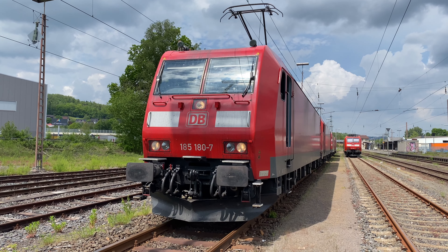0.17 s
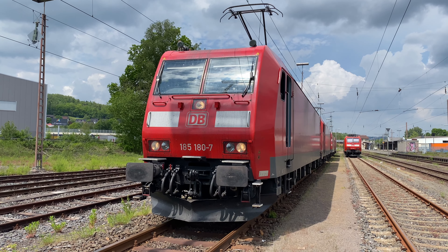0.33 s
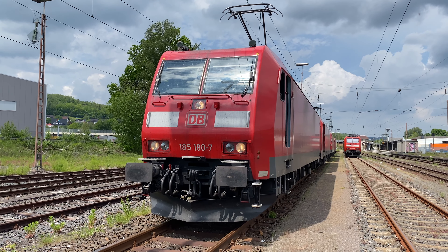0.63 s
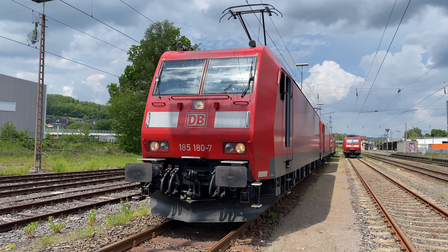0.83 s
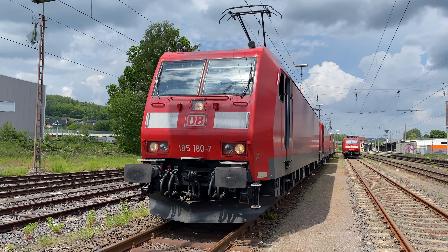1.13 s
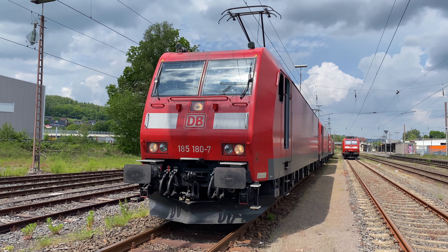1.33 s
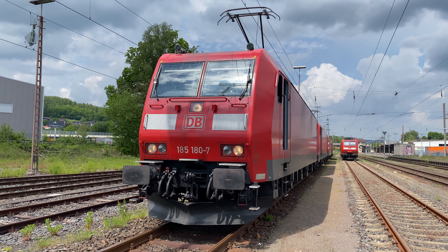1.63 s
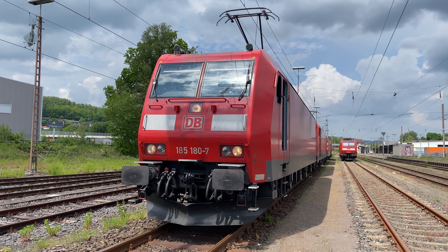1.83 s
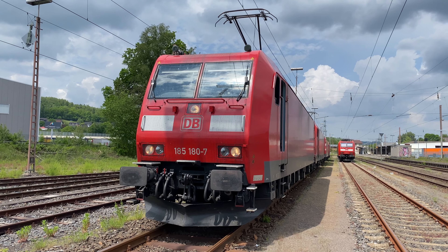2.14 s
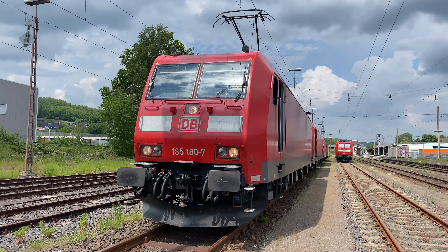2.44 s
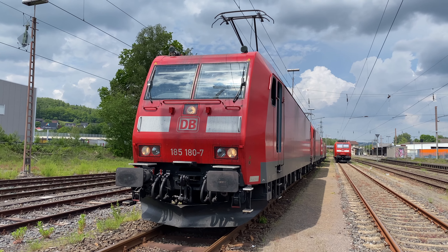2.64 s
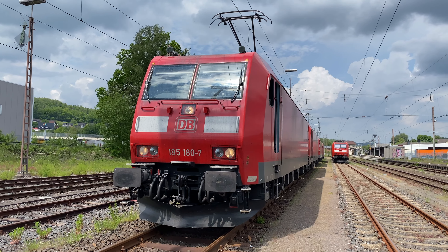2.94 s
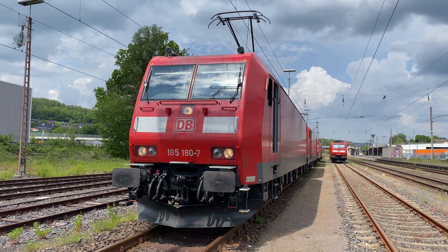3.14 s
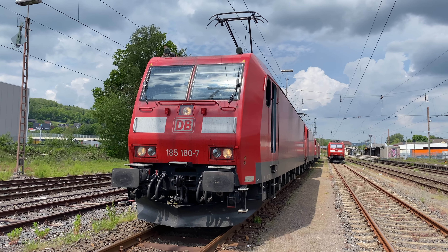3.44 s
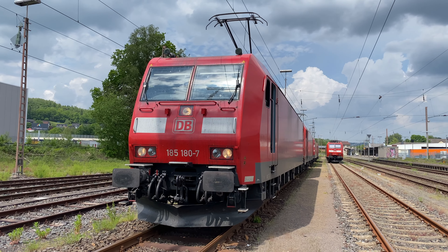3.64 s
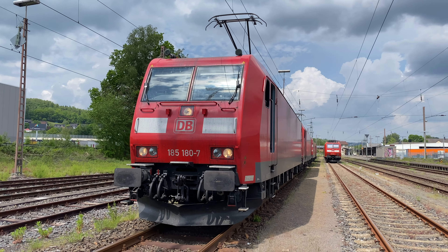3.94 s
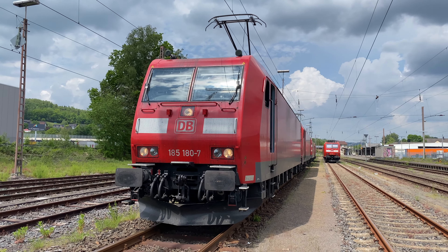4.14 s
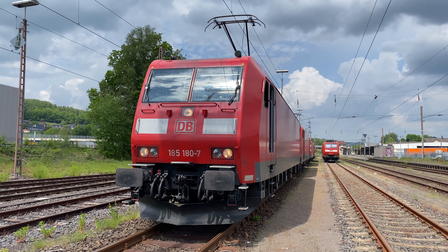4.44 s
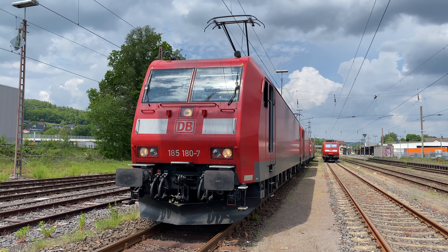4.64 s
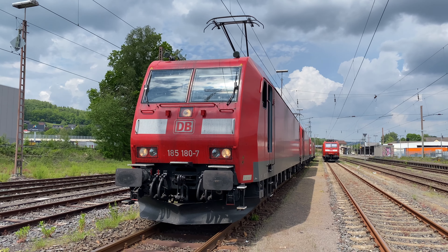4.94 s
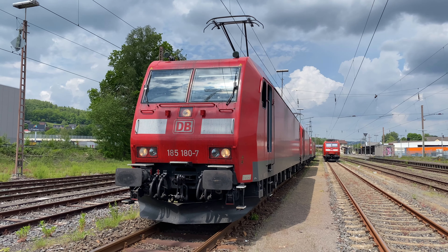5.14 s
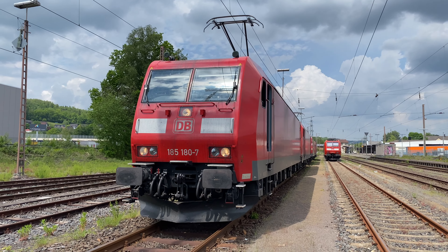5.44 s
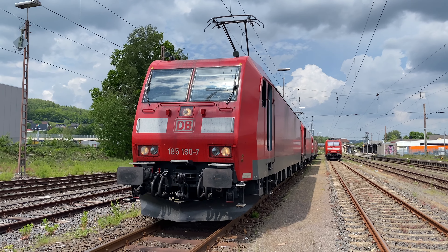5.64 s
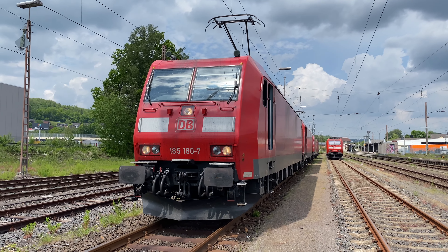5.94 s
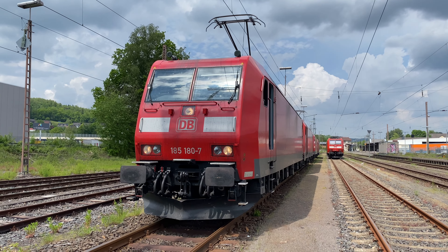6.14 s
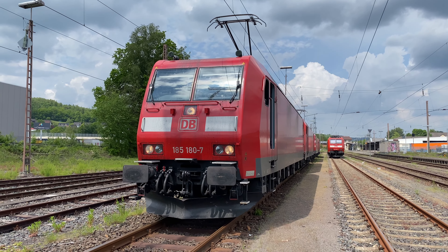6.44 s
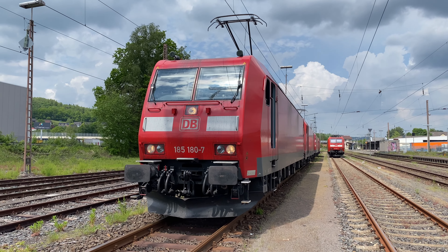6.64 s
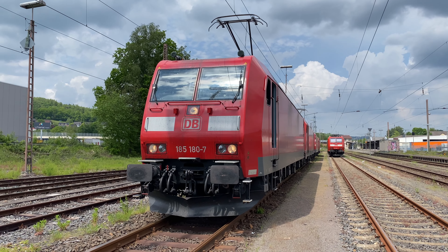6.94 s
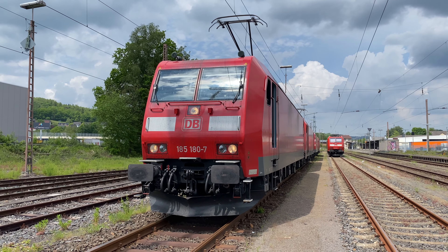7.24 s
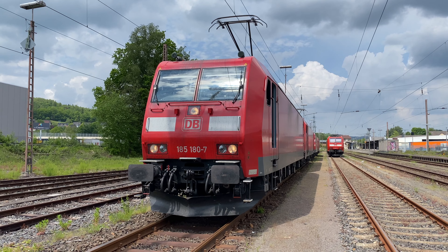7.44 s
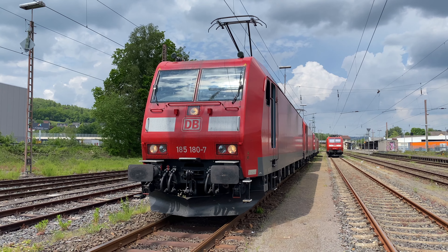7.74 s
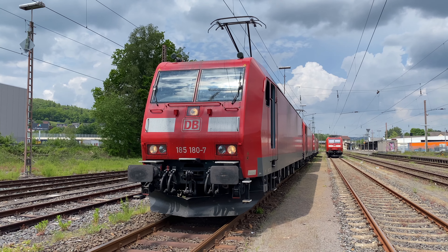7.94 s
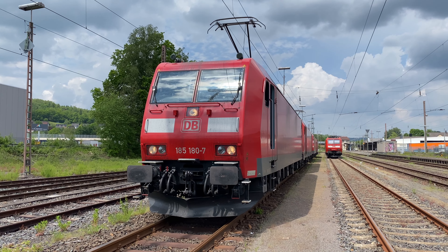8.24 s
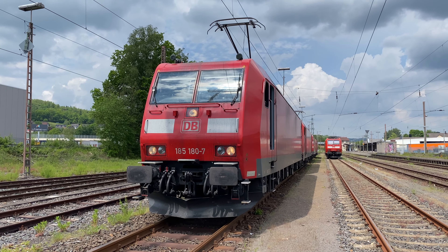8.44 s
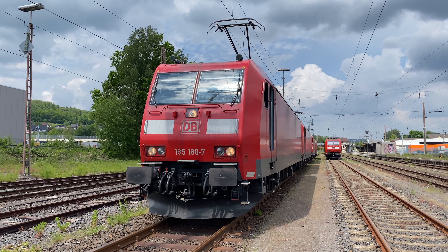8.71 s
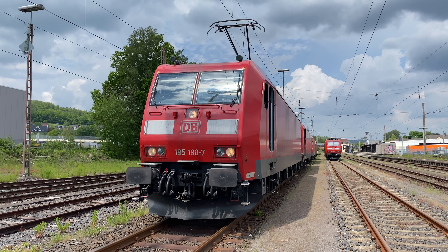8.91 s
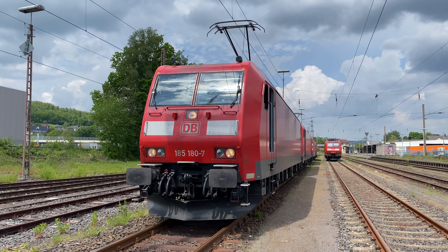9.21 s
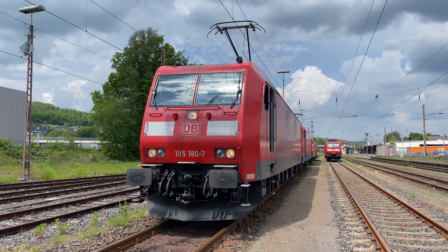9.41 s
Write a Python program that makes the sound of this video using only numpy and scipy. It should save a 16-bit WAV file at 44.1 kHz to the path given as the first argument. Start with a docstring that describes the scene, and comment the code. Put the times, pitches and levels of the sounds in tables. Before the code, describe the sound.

Constant fan roar, electrical hum and a thin throbbing whine from an idling electric locomotive, with low wind buffeting coming and going outdoors.

```python
"""Air rushes through cooling ducts, and the first gusts of wind rumble and thump on the microphone.
An electric locomotive stands switched on in a rail yard, a few metres from the hand-held microphone.
Its fans are filtered noise; motors and transformer hum as steady sines, the converter whines as throbbing
harmonics, and the motors buzz as combs of narrow-band noise. Wind is noise shaped by gusts, with single
pressure swings for the hardest eddies. There are a few small ticks, and the low sound dips briefly twice."""
import sys
import numpy as np
from scipy import signal
from scipy.fft import rfft, irfft
from scipy.io import wavfile

SR = 44100
rng = np.random.default_rng(int(sys.argv[2]) if len(sys.argv) > 2 else 0)


def int16_out(signal):
    """Quantize to a 16-bit WAV file."""
    q = np.round(np.clip(np.atleast_2d(signal).T, -1, 1) * 32767)
    wavfile.write(sys.argv[1], SR, q.astype(np.int16))


N = 422020
TIME, FREQ = np.arange(N) / SR, np.fft.rfftfreq(N, 1 / SR)  # s, Hz

SWITCH_HZ, OUTPUT_HZ = 253.52, 21.0  # converter switching and output rates
SHAFTS_HZ = (23.53, 24.5)  # rotation rates of the two fan motors
# gain course of the converter lines, shared in part by the high hum lines: (time [s], level [dB])
HIGH_LEVEL = [(0, 0), (1.2, 1.5), (2, 1), (3.2, 1.5), (3.6, -2), (4.0, 4.5), (4.4, 1.5), (5.3, 1.5),
              (5.8, 1), (6.5, 1), (7.2, 0.5), (8.4, 1), (9.5, 1.5)]


def gain_of(db):
    """Level is logarithmic: decibels to amplitude ratio."""
    return np.exp(np.asarray(db) * (np.log(10) / 20))


def read(points, hz):
    """Spectral interpolation: straight lines between table points on a log-frequency axis."""
    f, value = np.transpose(points)
    return np.interp(np.log(hz + 1), np.log(f + 1), value)


def course(points):
    """Level envelope: straight lines between table points in time."""
    return np.interp(TIME, *np.transpose(points))


def bell(x, centre, width):
    """Gaussian bump of height 1; width is the full width at 1/e."""
    return np.exp(-(2 * (x - centre) / width) ** 2)


def drift(rate_hz):
    """Low-pass random process of unit standard deviation: slow chance."""
    coarse = np.linspace(0, TIME[-1], 1024)
    hz = np.fft.rfftfreq(len(coarse), coarse[1])
    spectrum = rfft(rng.standard_normal(len(coarse))) / (1 + (hz / rate_hz) ** 2)
    wander = irfft(spectrum)
    return np.interp(TIME, coarse, wander / wander.std())


def sides(db):
    """Interchannel level difference: left and right gains of constant total power."""
    pair = gain_of(np.array([db, -db]) / 2).reshape(2, -1)
    return pair / np.sqrt(np.mean(pair ** 2, axis=0))


def noise(density):
    """Partial coherence: stereo noise of given amplitude per root Hz, partly alike at the two ports."""
    # coherence of the ports: (frequency [Hz], likeness [0-1, limited to 0.92 below])
    likeness = [(60, 0.82), (150, 0.84), (330, 0.89), (560, 0.79), (800, 0.63), (1100, 0.11), (2700, 0.18),
                (3300, 0.57), (4500, 0.8), (5300, 0.19), (7500, 1)]
    # phase between the ports: (frequency [Hz], left leads by [rad])
    left_lead = [(60, 0), (580, -0.33), (750, 0.97), (980, 1.7), (1300, 0.77), (1700, -0.94), (2000, -1),
                 (2400, 0.5), (2900, -0.5), (4000, -0.2), (4900, 0.5), (6400, 1), (7400, 0.5), (8500, -3),
                 (9600, -2.5), (10400, 0)]
    left, other = rfft(rng.standard_normal((2, N)))
    same = np.clip(read(likeness, FREQ), 0, .92)
    mixed = same * left + np.sqrt(1 - same ** 2) * other
    right = mixed * np.exp(-1j * read(left_lead, FREQ))
    return irfft(np.array([left, right]) * density * np.sqrt(SR / 2), N)


def push(s, db, hz, length):
    """Transient oscillation: a short swing of pressure at a random phase under a Gaussian envelope."""
    near, out = abs(TIME - s) < 4 * length, np.zeros(N)
    t = TIME[near] - s
    out[near] = gain_of(db) * bell(t, 0, 2 * length) * np.cos(2 * np.pi * (hz * t + rng.random()))
    return out


def tick(s, db, hz, length, crack_db=-12, crack_hz=2400, crack_s=.0003):
    """Impulsive excitation: a brief ring with a fainter crack at its centre."""
    return push(s, db, hz, length) + push(s, db + crack_db, crack_hz, crack_s)


def small_ticks():
    """Superposition of isolated transients, alike on both sides."""
    # rings: (time [s], envelope peak [dB], frequency [Hz], half-length at 1/e [s])
    rings = [(3.782, -36, 1400, .0008), (3.9541, -25, 1180, 0.0008), (4.324, -53, 10500, .0003),
             (4.768, -51.5, 6000, 0.0022), (4.808, -35, 1200, 0.00089), (4.81, -37, 3000, .0003)]
    return sum(tick(*row) for row in rings)


def gusting(bright):
    """Power addition of breeze and gusts, for the low part (0) or bright part (1) of the wind."""
    # gusts, before the rumble trim: (start [s], length [s], level [dB], extra level of bright part [dB])
    gusts = [(0.0, 0.066, -38, 3), (0.363, 0.26, -37, 0), (0.677, .19, -31.5, 0.5),
             (0.918, 0.28, -30.5, -1.5), (1.232, 0.099, -33.5, 0), (1.371, .12, -30, 3),
             (1.55, 0.12, -40, -4), (2.0, 0.72, -47, 8), (2.8, .2, -42, 6), (3.01, 0.15, -34.5, 1),
             (3.94, .6, -40, 0.5), (4.6, .05, -36.5, -4), (4.74, 0.12, -35.5, 3), (4.92, .22, -39.5, 5),
             (5.22, .2, -39.5, 3), (5.44, .1, -35, 2), (5.62, .42, -37.5, 1), (6.09, 0.1, -34.5, 1),
             (6.26, .3, -38, 1), (6.63, 0.054, -37, -2), (6.93, 0.14, -30.5, -6), (7.166, .05, -33, -5),
             (7.28, 0.14, -30, 5.5), (7.46, .11, -30, 1), (7.626, 0.2, -31, 5.5), (7.92, .08, -33, -2),
             (8.447, .22, -42, 1), (8.696, 0.077, -32.5, -8), (8.947, 0.75, -42.5, 4)]
    rise_s, fall_s, breeze_db = 0.037, 0.043, -46
    power = gain_of(breeze_db) ** 2
    for start, length, db, bright_db in gusts:
        rise = np.clip((TIME - start) / rise_s + .5, 0, 1)
        fall = np.exp(-np.clip((TIME - start - length) / fall_s, 0, 20))
        power = power + (gain_of(db + bright * bright_db) * rise * fall) ** 2
    return np.sqrt(power)


def wind(rumble_db=-1, eddy_db=-1.5, lump_db=1.94, split_hz=135, eddy_cycles=0.75):
    """Turbulent pressure on the microphone: noise modulated by the gusts, with single eddies thumping."""
    # shape of the rumble spectrum: (frequency [Hz], relative density [dB per Hz])
    rumble_shape = [(10, -47), (22, -14), (33, -12), (47, 1.5), (62, 2.5), (85, -2.5), (130, -8),
                    (250, -19), (400, -33), (900, -60), (3000, -110)]
    # hardest eddies, before the eddy trim: (time [s], envelope peak [dB], frequency [Hz])
    eddies = [(0.067, -23, 156), (0.596, -25, 130), (0.709, -22.5, 90), (0.755, -26, 65),
              (0.845, -19.5, 95), (0.949, -20, 63), (0.99, -22, 111), (1.028, -17.5, 106),
              (1.145, -18.5, 90), (1.334, -22, 75), (1.384, -21.5, 135), (1.45, -18, 82.6),
              (3.044, -18.5, 92), (3.08, -24, 100), (3.155, -21.5, 110), (3.954, -26, 130),
              (4.771, -25, 142), (4.815, -24, 127), (5.266, -24, 95), (5.471, -21, 112), (5.503, -24.5, 80),
              (5.547, -27, 80), (5.643, -22, 83), (5.748, -27, 65), (5.898, -23.5, 75), (6.003, -23.5, 80),
              (6.119, -23, 105), (6.193, -25.5, 90), (6.298, -26, 90), (6.424, -24, 108), (6.994, -25, 78),
              (7.051, -15.5, 68.5), (7.192, -18, 68), (7.358, -15, 87), (7.404, -17.5, 99),
              (7.475, -21.5, 68), (7.561, -17, 86), (7.731, -22, 100), (7.772, -15.5, 124),
              (7.788, -19, 150), (7.843, -22.5, 80), (8.755, -20.5, 96)]
    rumble = noise(gain_of(read(rumble_shape, FREQ)))
    rumble = rumble / rumble.std()
    deep = irfft(rfft(rumble) / (1 + (FREQ / split_hz) ** 6), N)
    gusty = deep * gusting(0) + (rumble - deep) * gusting(1)
    blown = gusty * gain_of(rumble_db + lump_db * drift(18))
    thumps = sum(push(s, db + eddy_db, hz, eddy_cycles / hz) for s, db, hz in eddies)
    return blown + thumps


def tone(hz, db, balance_db, lead, fade_db=3.0, wobble=0.4, wobble_hz=5000):
    """Interference: reflections make a line fade at each port, its phase wavering more the higher it is."""
    # passing swells of single whines: (centre [s], width at 1/e [s], line [Hz], gain [dB])
    swells = [(3.9, .7, 1672, 2.5), (5.35, .5, 1672, -6), (5.95, .5, 1672, 3), (6.55, .4, 1672, -4),
              (7.8, 1.9, 1672, 2.5), (9.5, .9, 1672, -5), (4.1, .8, 3042, 3), (9.0, 1.4, 3042, 4),
              (.6, 1.2, 3296, 3), (2.7, .8, 3296, 3), (3.85, 1.0, 3296, -10), (5.8, 1.8, 3296, -3),
              (7.3, .8, 3296, 5), (8.35, .8, 3296, 4), (1.55, .7, 3311, 4), (9.1, 1.2, 3311, 3),
              (4.5, 1.3, 3311, -6), (7.3, 3.0, 3311, 3), (6.95, 1.4, 5324, 10), (8.1, .6, 5324, 4),
              (9.3, 1.0, 5324, 5), (2.7, .6, 5324, 4), (1.8, 1.0, 5577, 6), (5.05, .5, 5577, 5),
              (6.2, .6, 5577, 4), (9.2, .6, 5577, 5)]
    phase = 2 * np.pi * (hz * TIME + rng.random()) + wobble * drift(1.4)
    waver = hz / wobble_hz * np.array([drift(2.4), drift(2.1)]) - np.array([[0], [lead]])
    swell_db = sum(rise * bell(TIME, s, length) for s, length, line, rise in swells if abs(line - hz) < 2)
    fade = gain_of(swell_db + fade_db * np.array([drift(0.86), drift(0.66)]))
    return np.sqrt(2) * gain_of(db) * fade * sides(balance_db) * np.sin(phase + waver)


def buzz(shaft_hz, level_db=-1, uneven_db=3, width_hz=1.97):
    """Harmonic series of one fan motor: narrow noise lines at the shaft multiples, of uneven strength."""
    # envelope of the comb, before trim: (frequency [Hz], level [dB per line])
    comb_level = [(800, -80), (1050, -84), (1200, -77.5), (1550, -80), (1730, -82), (2000, -85),
                  (2300, -85), (2850, -87.5), (2960, -87.5), (3250, -81.5), (3420, -90.5), (3750, -80),
                  (4200, -82), (4500, -86), (4850, -82.5), (5000, -94), (5280, -85.5), (5450, -91),
                  (6100, -90.5), (6300, -102), (6600, -93), (6800, -102), (7300, -98), (8200, -101)]
    order = np.round(FREQ / shaft_hz).astype(int)
    strength_db = uneven_db * rng.standard_normal(order[-1] + 1)[order]
    comb = bell(FREQ, order * shaft_hz, 2 * width_hz) / np.sqrt(width_hz)
    inside = (FREQ > comb_level[0][0]) & (FREQ < comb_level[-1][0])
    return noise(inside * comb * gain_of(read(comb_level, FREQ) + strength_db + level_db))


def converter(level_db=-0.5, fade_db=1.7):
    """Amplitude modulation: switching harmonics throb at the output rate, which gives each two sidebands."""
    # harmonics, before trim:
    # (multiple of switching rate, level [dB], left-right [dB], left leads by [rad], throb depth [0-1])
    harmonics = [(12, -71, 3, -0.5, .45), (13, -67.5, 6, -0.2, .22), (14, -69.3, 9, -1.2, .2),
                 (15, -80, 0, -0.5, .5), (16, -73.5, 2, -0.4, .4), (17, -82, 0, -0.5, .4),
                 (18, -76, 0, -0.1, .6), (19, -73.3, 3, 0.5, .7), (20, -83, 0, 1.0, .5),
                 (21, -76.3, 3, 0.6, .5), (22, -75, -3, -2.4, .2), (23, -80, 0, 0.3, .3),
                 (24, -81, 0, 0.5, .3), (29, -89, 0, -0.4, 1)]
    stack, high_db = np.zeros((2, N)), course(HIGH_LEVEL)
    for order, db, pan, lead, depth in harmonics:
        throb = 1 + depth * np.cos(2 * np.pi * OUTPUT_HZ * TIME + drift(0.74))
        stack += throb * tone(order * SWITCH_HZ, db + level_db + high_db, pan, lead, fade_db)
    return stack


def hum(level_db=-0.55, fade_db=1.3, high_share=0.47, whine_hz=1210, high_from_hz=3160):
    """Line spectrum of fan blades, motors and transformer, with a few steady sidebands of the converter whine;
    the higher lines fade more."""
    # steady tones, before trim: (frequency [Hz], level [dB], left-right [dB], left leads by [rad])
    lines = [(273, -56, -1, -0.2), (471, -61.5, -5, -0.1), (588, -52, -9, 0.1), (608, -60, -8, 0.1),
             (712, -69, -4, 0.5), (954, -71, 5, 1.6), (1176, -72, -3, 0), (1189, -60.7, -7, -0.7),
             (1234.6, -60.7, 5, 1.1), (1246, -73, 2, 0.7), (1424, -71, -5, -1.9), (1638, -70, 0, -2.0),
             (1672, -65, -1, -0.3), (1696, -73, 0, -0.5), (1853, -71, 0, -0.4), (1877, -71.3, 4, -0.1),
             (2184, -74, 1, -0.1), (2365, -73, 2, 2.6), (2390, -71, 6, 2.4), (2515, -77, 8, -1.3),
             (2755, -77, 7, 0.5), (2789, -77, 7, -2.1), (2941, -73, 0, -1.1), (3093, -76, -1, -0.3),
             (3157, -74, 0, -0.1), (3275, -76, 2, -0.2), (3311, -68, 2, -0.1), (3494, -74, 3, 0.1),
             (3643, -76, -1, 0.0), (3677, -76, 6, -0.6), (3800, -74, 0, -0.2), (3821, -76, 0, -0.2),
             (4019, -75, 0, -0.3), (4148, -77, 1, -0.5), (4764, -77, 4, 0.3), (4796, -79, 4, 0.3)]
    # gain of the fan whines around whine_hz, as the microphone shifts: (time [s], level [dB])
    whine_level = [(0, 1), (2, 1.5), (3.6, 3), (4.1, -2.5), (5, -2), (6.2, -5.5), (7.1, -1.5), (9.5, -2)]
    whine_db, high_db = course(whine_level), high_share * course(HIGH_LEVEL)
    total = np.zeros((2, N))
    for hz, db, pan, lead in lines:
        line_db = db + level_db + whine_db * bell(hz, whine_hz, 300) + high_db * (hz > high_from_hz)
        total += tone(hz, line_db, pan, lead, fade_db * np.sqrt(hz / whine_hz))
    return total


def shifting(x, depth_db):
    """Comb filtering: weak near reflections come and go, sending shallow ripples through the spectrum."""
    lags = np.round(np.array([.0003, .0007, .0016]) * SR).astype(int)  # s to samples
    reflections = sum(drift(0.67) * np.roll(x, lag, axis=1) for lag in lags)
    return x + (gain_of(depth_db) - 1) * reflections


def fans(roar_db=0.2, rush_db=0.15, hiss_db=-0.24, surge_db=1.17, churn_db=1.23, flutter_db=0.82,
         shift_db=1.0):
    """Broadband flow noise coloured by duct resonance, in three bands that fluctuate separately."""
    # cooling air, before resonances and trims: (frequency [Hz], density [dB per Hz])
    air = [(20, -100), (55, -71), (100, -61), (170, -60), (250, -64), (390, -76), (500, -76.5), (650, -78),
           (880, -83), (1500, -86.5), (2000, -88), (2700, -90.5), (3400, -92), (4100, -91), (4700, -94),
           (5050, -96), (6500, -101), (7400, -101.5), (8300, -104), (10500, -113), (11700, -116),
           (12500, -122)]
    # resonances of air ducts and body: (frequency [Hz], width at 1/e [Hz], gain [dB])
    ducts = [(134.7, 9.3, 2.5), (167.2, 15, 5.5), (193.4, 15, 1.5), (223.7, 25, 3.5), (320.3, 19, 7),
             (346.8, 18, 7.5), (401, 16, 2), (501, 76, 5), (515.4, 17, 4.5), (576, 38, 9.5), (608, 30, 8.5),
             (694, 43, 2.5), (771.5, 44, 8), (812, 28, 2.5), (938, 33, 4), (1294, 150, 6), (1800, 250, 2.5),
             (2195, 100, 5), (3070, 80, 4.5), (3302, 50, 8), (4790, 130, 3)]
    # balance of the air noise: (frequency [Hz], left-right [dB])
    air_balance = [(440, 0), (490, -3.5), (660, -10), (780, -3), (850, 0.5), (1500, -2), (2100, -0.5),
                   (2750, 2.5), (3600, -0.5)]
    colour = read(air, FREQ) + sum(db * bell(FREQ, hz, width) for hz, width, db in ducts)
    density = gain_of(colour) * sides(read(air_balance, FREQ))
    # power shares of the bands
    low = 1 / (1 + (FREQ / 390) ** 8)
    high = 1 - 1 / (1 + (FREQ / 1500) ** 6)
    roar = noise(density * np.sqrt(low)) * gain_of(roar_db + surge_db * drift(10))
    rush = noise(density * np.sqrt((1 - low) * (1 - high))) * gain_of(rush_db + churn_db * drift(6.5))
    hiss = noise(density * np.sqrt((1 - low) * high)) * gain_of(hiss_db + flutter_db * drift(6.3))
    return roar + rush + shifting(hiss, shift_db)


def locomotive(recede_db_per_s=0.0945):
    """Superposition of sources, growing slightly fainter with distance as the microphone moves."""
    motors = sum(buzz(hz) for hz in SHAFTS_HZ)
    machine = fans() + hum() + converter() + motors
    return machine * gain_of(-recede_db_per_s * (TIME - TIME.mean()))


def dipped(x, corner_hz=480):
    """Time-varying low-band attenuation: the low sound sinks for a moment, twice."""
    # dips: (time [s], depth [dB], half-length at 1/e [s])
    dips = [(3.27, 5.5, 0.097), (8.872, 12.5, 0.027)]
    low = irfft(rfft(x) / (1 + (FREQ / corner_hz) ** 8), N)
    dip_db = sum(db * bell(TIME, s, 2 * length) for s, db, length in dips)
    return x + low * (gain_of(-dip_db) - 1)


def scene():
    """Superposition of locomotive and wind, dipped together, and the ticks."""
    return dipped(locomotive() + wind()) + small_ticks()


def record(dry, low_cut_hz=27, edge_hz=12600):
    """Band limitation: the microphone's bass roll-off, then the recorder's steep upper edge."""
    lean = irfft(rfft(dry) * (1 - 1 / (1 + (FREQ / low_cut_hz) ** 4)), N)
    lowpass = signal.firwin(511, edge_hz, window=("kaiser", 9), fs=SR)
    return signal.oaconvolve(lean, lowpass[None], "same")


dry = scene()
out = record(dry)
int16_out(out)
```